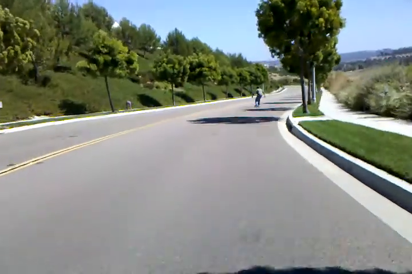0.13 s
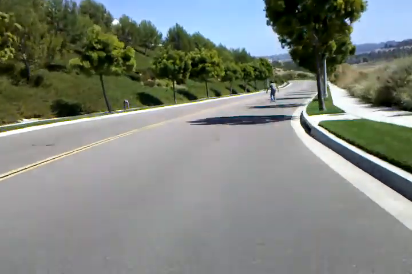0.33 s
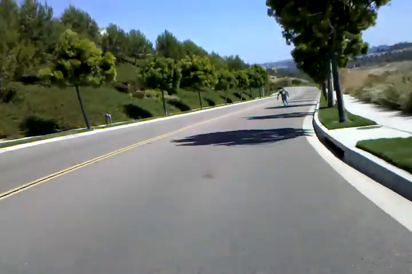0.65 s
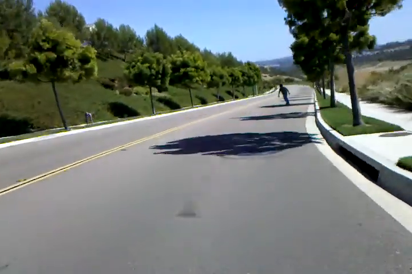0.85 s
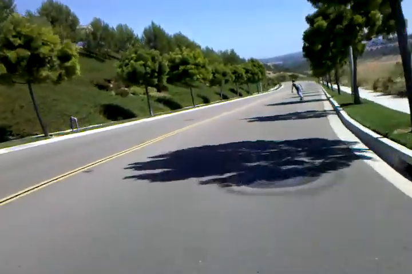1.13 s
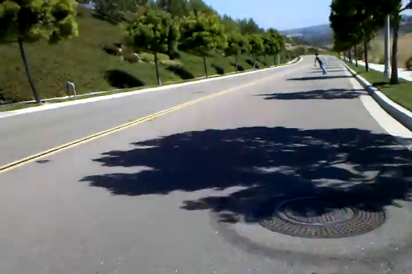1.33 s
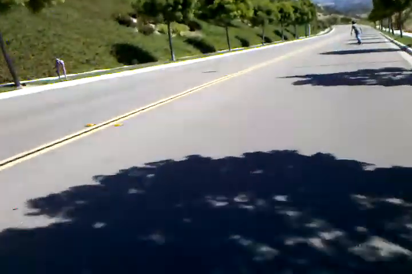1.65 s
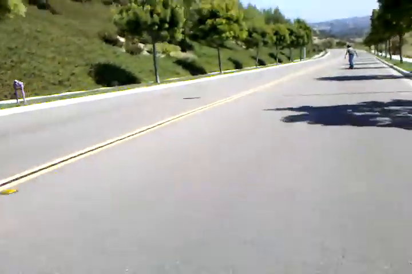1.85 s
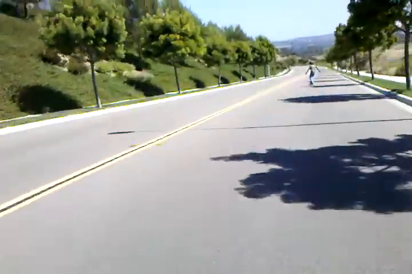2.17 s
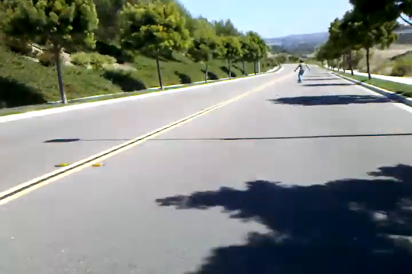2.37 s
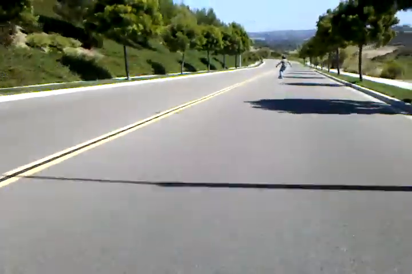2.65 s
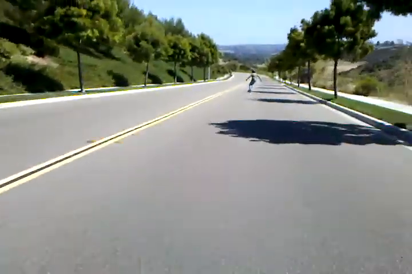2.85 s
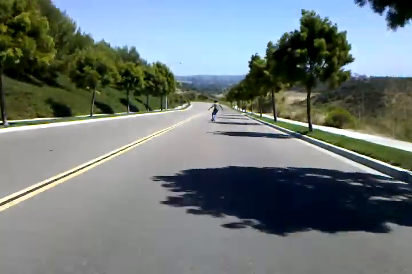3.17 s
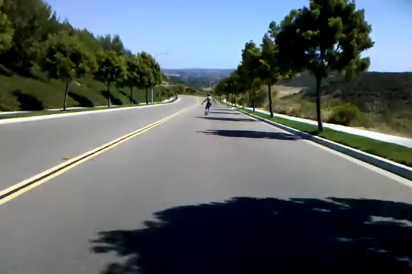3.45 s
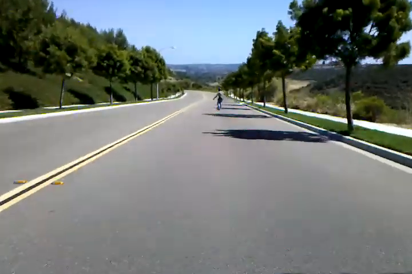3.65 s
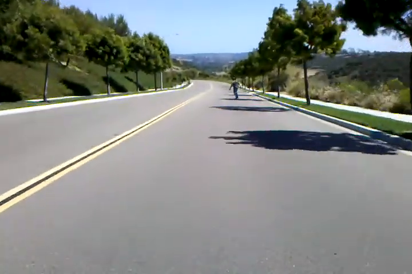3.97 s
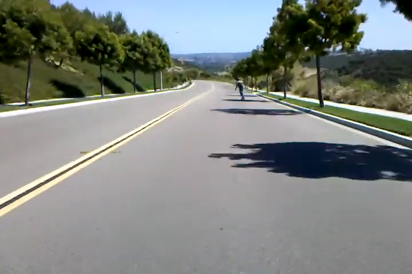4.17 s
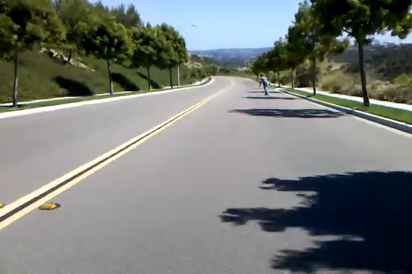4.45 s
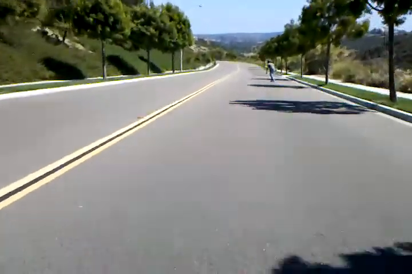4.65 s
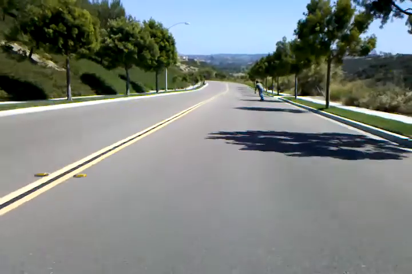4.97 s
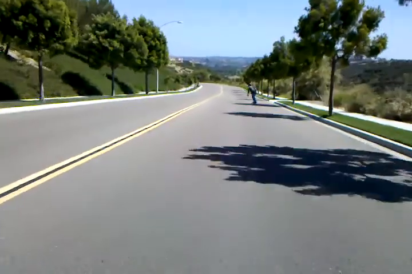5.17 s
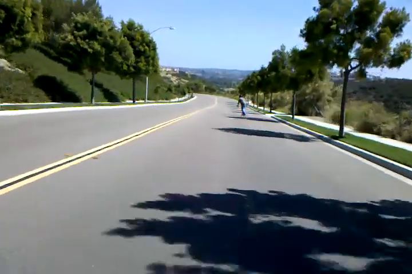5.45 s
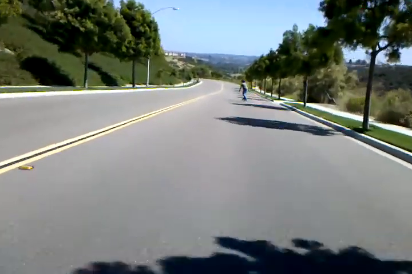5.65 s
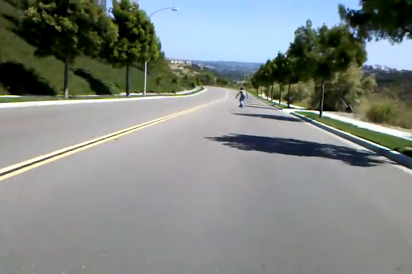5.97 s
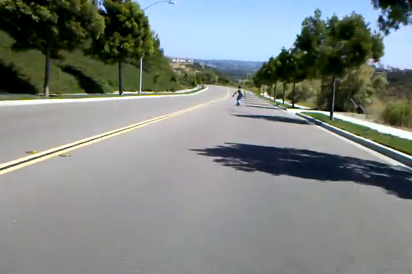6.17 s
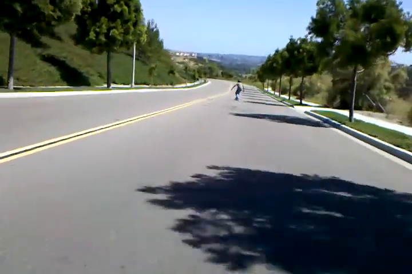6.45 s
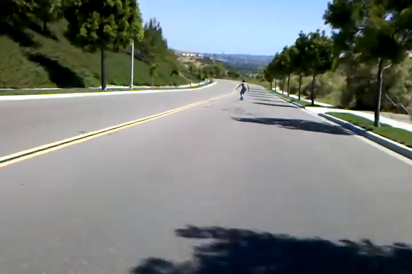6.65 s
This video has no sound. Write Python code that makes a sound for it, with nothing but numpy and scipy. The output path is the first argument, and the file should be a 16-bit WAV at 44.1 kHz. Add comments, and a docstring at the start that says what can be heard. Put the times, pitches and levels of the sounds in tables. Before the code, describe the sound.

A longboard rolls fast down an open asphalt road, heard from a small camera carried on the ride. From 0 seconds, wind buffets and rushes across the microphone, fluttering quickly, with a short opening swell and scattered soft thumps. Beneath it the wheels drum the road grain into the wooden deck, and the tread hisses thinly. From about 1.8 to 2.1 seconds the drumming surges as the board crosses an iron cover: a cluster of knocks with a brief ringing metal rattle. The ride then settles into rumble and wind, swelling around 2.8 and again near 4 seconds, with a sharp thump at 4.1. From 5 seconds gusts strengthen and thumps grow heavier, with a tiny tick near 5.2. The hardest blows, about 5.8 to 6.3, clip flat. Strong, brighter wind continues until the abrupt end near 6.8 seconds. The tone is close, rough and slightly muffled.

```python
"""Wind buffets and rushes over the microphone port of a small camera on a longboard, fast on an open asphalt road.
The wind is filtered noise that flutters, swells and dips; eddies and bumps are short pressure swings.
Below, the wheels drum the road grain into the deck (random taps that ring it) and the tread hisses (bright noise).
The board bumps over an iron cover that rattles (ringing noise bursts).
The recorder dulls the top, thins the deepest bass and clips the strongest swings flat."""
import sys
import numpy as np
from scipy import signal
from scipy.fft import rfft, irfft, next_fast_len
from scipy.io import wavfile
from scipy.ndimage import uniform_filter1d

SR = 44100
rng = np.random.default_rng(int(sys.argv[2]) if len(sys.argv) > 2 else 0)


def makeup_ratio(level_db):
    """Linear amplitude ratio for a level in decibels (20 dB per factor of ten)."""
    decades = np.asarray(level_db, float) / 20
    return 10 ** decades


def int16_out(signal):
    """Quantize to a 16-bit WAV file."""
    q = np.round(np.clip(np.atleast_2d(signal).T, -1, 1) * 32767)
    wavfile.write(sys.argv[1], SR, q.astype(np.int16))


N = 300762

# How the ride gathers speed and the wind swings: t/s, strength/dB over a reference level, extra treble/dB
WIND_STRENGTH = [(0, -2, -0.5), (.5, -.5, 3), (.73, -0.5, -2), (.8, 1, 0.5), (.92, 3.5, -2),
                 (1.2, -0.5, -0.5), (1.42, 0.5, -0.5), (1.75, -.5, 3), (2.15, 2, 0.5), (2.75, 4, 2),
                 (3.2, 2, 1), (3.75, 0.5, 0.5), (3.95, 4.5, 1), (4.25, 4.5, 1.5), (4.45, 3, 2),
                 (4.65, 3.5, 4), (4.85, 3, -0.5), (5.05, 5.5, -0.5), (5.25, 6, -1), (5.44, 5.5, 5.5),
                 (5.62, 4.5, 3.5), (6.05, 8, 2), (6.35, 5, 3), (6.55, 6.5, 1.5), (6.75, 7, 7),
                 (6.82, 8.5, 3)]
# Short swells and (minus) dips of the wind noise: t/s, length/s, change/dB, lean (about -1 dull to 1 bright)
SWELLS_AND_DIPS = [(0, 0.099, 7.5, -0.16), (0.09, 0.054, -0.5, -0.091), (.14, 0.035, -1.5, 0),
                   (0.228, .04, 2, -1.2), (0.292, .04, 4.5, -0.21), (.43, 0.055, 0.5, 1),
                   (0.62, 0.045, -3.5, -0.15), (0.678, 0.038, 3, -0.97), (.74, .04, -1.5, .2),
                   (.79, .04, 2, .5), (.88, .04, 2, 1), (.955, .04, 1, -.3), (1.0, .04, -2, 1),
                   (1.082, .05, 3.5, -0.17), (1.155, 0.066, -2, -0.11), (1.313, .04, -2, 0),
                   (1.228, 0.048, -0.5, -1.1), (1.366, .05, 3.5, 0.16), (1.49, 0.036, 1.5, -0.4),
                   (1.668, .06, -0.5, -0.17), (2.108, .06, -1, 0), (2.247, 0.058, 2, -.5),
                   (3.022, 0.039, 1, 0), (3.13, .08, -1.2, 0), (3.563, .1, 2, 0.52),
                   (3.66, 0.064, -1.5, .2), (3.783, 0.052, -1.5, 0.14), (3.9, .05, 1, 1),
                   (4.065, 0.035, -5, -0.19), (4.1, .04, 3.5, -0.28), (4.177, 0.064, 2, 0.9),
                   (4.344, .05, 1.5, -1), (4.385, .04, -1.5, 1), (4.856, 0.046, -1.5, 0),
                   (4.964, 0.08, 1.5, -0.3), (5.02, .02, 4, 0), (5.085, .04, -2, 0), (5.222, 0.035, 2, 0),
                   (5.39, .08, 1, 0.93), (5.466, 0.032, 2.5, -0.65), (5.556, 0.067, -1, -1),
                   (5.62, 0.048, -3, .3), (5.83, 0.051, 3, -0.4), (5.884, 0.035, -2, -.6),
                   (5.986, 0.09, 2.5, 0.42), (6.132, 0.07, 2, -0.54), (6.184, .04, -3.5, 0.6),
                   (6.244, .04, 3.5, -0.11), (6.678, 0.054, 1.5, -1)]
# Tone colours of the four noises, before each is set to its level: f/Hz, level/dB per Hz
BUFFET_COLOUR = [(15, -52.5), (25, -35), (43, -33), (88, -7), (125, -1.5), (180, -0.5), (300, -3.5),
                 (600, -10), (1200, -28), (3000, -51.5)]
RUSH_COLOUR = [(150, -26.5), (400, -0.5), (700, -0.5), (1000, -1.5), (1500, -5), (2050, -12.5),
               (3000, -29.5), (6000, -52)]
WHOOSH_COLOUR = [(700, -24), (1400, -2.5), (2000, -1), (2600, -4.5), (3400, -8.5), (4200, -16.5),
                 (6000, -30), (9000, -55)]
TREAD_HISS_COLOUR = [(2000, -26.5), (3500, -4), (4200, -4.5), (5150, -0.5), (5600, -3.5), (6200, -11.5),
                     (6900, -17), (9000, -17)]
# Thumps of eddies and road bumps: t/s, approximate peak level/dB, pitch f/Hz
EDDY_THUMPS = [(.2414, -12, 400), (.569, -10, 800), (.6637, -14, 348), (.6873, -10, 450), (.9599, -10, 400),
               (1.069, -13, 330), (1.46, -10.5, 700), (1.885, -8, 400), (1.9, -9, 400), (1.921, -9, 400),
               (1.9426, -5, 330), (1.9534, -7, 346), (1.9657, -5.5, 430), (1.9949, -5, 367),
               (2.024, -8, 420), (2.0381, -5.5, 600), (2.049, -7, 500), (2.063, -8, 400),
               (2.2391, -10, 380), (2.4851, -10, 420), (2.6731, -11, 420), (2.822, -9.5, 390),
               (2.999, -11, 600), (3.0208, -7, 1000), (3.0295, -9, 400), (3.11, -8, 450),
               (3.4492, -8.5, 750), (3.5821, -12, 300), (3.7182, -9.5, 800), (4.0156, -11, 400),
               (4.0888, -5, 596), (4.2114, -10.5, 450), (4.3351, -9, 374), (4.5759, -13, 400),
               (4.9535, -4.5, 294), (4.9906, -6, 330), (5.0271, -8, 600), (5.129, -9, 298),
               (5.2186, -7, 760), (5.455, -7, 270), (5.6756, -5, 650), (5.2331, -4.2, 300),
               (5.4752, -2.7, 350), (5.8263, -.9, 400), (5.8355, -2.2, 330), (6.0027, 0, 300),
               (6.0502, -2.3, 355), (6.1179, -2.6, 760), (6.1344, -2, 668), (6.075, -4, 344),
               (5.9587, -4.5, 493), (6.2252, -6.5, 297), (6.2497, -4, 227), (6.6479, -6, 407),
               (6.7772, -6, 500)]
# Resonances of the deck: f/Hz, width/Hz, relative level/dB
DECK_MODES = [(335, 120, -4.5), (436, 80, 1.5), (510, 80, -3), (916, 80, -11)]
# Roughness of the asphalt under the wheels: t/s, change on the deck/dB
ROAD_ROUGHNESS = [(0, 0), (.9, .5), (1.7, -.5), (2.3, 1), (3.3, 1.5), (3.7, 0), (4.5, 1.5), (5.5, 0),
                  (6.82, -.5)]
# Resonances of the iron cover: f/Hz, width/Hz, relative level/dB
COVER_MODES = [(1320, 70, 3), (1590, 150, 4.5), (1870, 200, 1.5), (2140, 90, -1), (2780, 350, -4),
               (3335, 150, -1), (4150, 400, -6.5), (4990, 250, -8), (5448, 55, 3), (5562, 50, 2.5),
               (6910, 200, -24)]
# Rattles of loose iron under the wheels: t/s, level before the band cut/dB, length/s, fade/s, top f/Hz
IRON_RATTLES = [(1.931, -17.5, .021, .011, 7500), (1.964, -25, .008, .014, 3000),
                (2.02, -24, .012, .01, 1600), (2.034, -21.5, .022, .009, 1700),
                (5.226, -22, .003, .0015, 5500)]


def turbulence(colour, shared_db, flicker_db, flicker_rate):
    """Coloured noise in overlapping octave bands, each flickering alone on top of a shared flutter."""
    size = next_fast_len(N)
    octave = np.log2(np.maximum(np.arange(size // 2 + 1) * SR / size, 1))
    hz, db = np.transpose(colour)
    spectrum = rfft(rng.standard_normal(size)) * makeup_ratio(np.interp(octave, np.log2(hz), db))
    out = 0
    for centre in np.arange(np.floor(np.log2(hz[0])), np.log2(hz[-1]) + 1):
        share = np.cos(np.pi / 2 * np.clip(octave - centre, -1, 1)) ** 2
        octave_band = irfft(spectrum * share, size)[:N]
        out = out + octave_band * makeup_ratio(flicker_db * walk(flicker_rate))
    return out * makeup_ratio(shared_db)


def buffet(flutter, db):
    """Low buffeting as the flow over the port breaks up and rejoins."""
    return in_band(turbulence(BUFFET_COLOUR, 1.1 * flutter, 1.1, 14), 70, 242, db)


def rush(flutter, db):
    """The middle of the wind noise, which flutters twice as deeply in dB as the buffeting."""
    return in_band(turbulence(RUSH_COLOUR, 2.2 * flutter, .9, 20), 645, 1600, db)


def whoosh(flutter, swing, db):
    """The brighter wind noise, which flutters and slowly wavers."""
    return in_band(turbulence(WHOOSH_COLOUR, 1.86 * flutter + swing, 1.0, 30), 1700, 3300, db)


def thumps():
    """Each is a push between two smaller pulls; also returns how far the port is blocked, from 0 to 1."""
    out, blocked, t = np.zeros(N), np.zeros(N), np.arange(N) / SR
    swell_cycles = .9  # sets how many cycles fit into a thump
    for s, db, hz in EDDY_THUMPS:
        near = np.abs(t - s) < .02
        turn = (t[near] - s) * hz
        swell = np.exp(-(turn / swell_cycles) ** 2 * 2.5)
        push = np.cos(2 * np.pi * turn) * swell
        balanced = push - swell * push.sum() / swell.sum()  # no lasting pressure is left
        out[near] += makeup_ratio(db) * balanced
        blocked[near] = np.maximum(blocked[near], swell)
    return out, blocked


def deck(db):
    """Road grain under the wheels: dense uneven taps that ring the wooden deck."""
    taps_per_s = 700
    strength_db = np.minimum(4.3 * rng.exponential(size=N), 9)
    taps = rng.standard_normal(N) * makeup_ratio(strength_db) * (rng.random(N) < taps_per_s / SR)
    soft = band(taps, 55, 1500)  # the urethane wheels round every tap
    drumming = ring(soft * makeup_ratio(0.36 * walk(35)), DECK_MODES)
    return in_band(drumming, 210, 650, db)


def cover():
    """The loose lid chatters in its frame under the wheels: uneven noise that rings, plus a broad scrape."""
    out, t = 0, np.arange(N) / SR
    chatter = rng.standard_normal(N) * makeup_ratio(0.75 * walk(300))
    ringing = level(ring(chatter, COVER_MODES), 0)
    low_pass = signal.butter(1, 2500, fs=SR, output="sos")
    scrape = signal.sosfilt(low_pass, rng.standard_normal(N) * makeup_ratio(4.5 * walk(400)))
    iron = ringing + level(scrape, -5)  # wheel on iron, 5 dB under the ringing
    for s, db, length, fade, top_hz in IRON_RATTLES:
        rise = np.clip((t - s) / 0.004, 0, 1)
        fall = np.exp(-np.clip(t - s - length, 0, None) / fade)
        out = out + makeup_ratio(db) * rise * fall * band(iron, 880, top_hz)
    return out


def tread_hiss(flutter, swing, db):
    """Hiss of the tread: bright noise that flutters and wavers along with the wind."""
    return in_band(turbulence(TREAD_HISS_COLOUR, 1.8 * flutter + swing, 0.99, 30), 4000, 6500, db)


def swell_levels(t):
    """Adds up the short swells and dips as smooth bumps in dB, for the dull, middle and bright sounds."""
    dull, middle, bright = 0, 0, 0
    for at, length, db, lean in SWELLS_AND_DIPS:
        bump = db * np.exp(-((t - at) / length * 2) ** 2)
        dull = dull + (1 - lean) * bump
        middle = middle + bump
        bright = bright + (1 + lean) * bump
    return dull, middle, bright


def crossing(t):
    """How far the wheels are on the ribbed cover, 0 to 1: a straight rise, a hold and a straight fall."""
    start_s, rise_s, hold_s, fall_s = 1.795, .13, 0.087, 0.1
    end_s = start_s + rise_s + hold_s
    return np.clip(np.minimum((t - start_s) / rise_s, 1 - (t - end_s) / fall_s), 0, 1)


def levels():
    """Levels in dB of buffeting, deck, rush, whoosh and hiss from the wind, swells, road and crossing."""
    t = np.arange(N) / SR
    s, strength_db, treble_db = np.transpose(WIND_STRENGTH)
    strength, treble = np.interp(t, s, strength_db), np.interp(t, s, treble_db)
    dull, middle, bright = swell_levels(t)
    cross = crossing(t)
    air_db = 6.5 * cross  # the low and middle wind noise also rises at the cover
    road_db = np.interp(t, *np.transpose(ROAD_ROUGHNESS))
    # each has a level at strength 0 and changes by so many dB per dB of strength
    buffet_db = -31 + 1.12 * strength + dull + air_db
    deck_db = -29.5 + 0.64 * strength + road_db + .7 * dull + 8.5 * cross  # drums harder on the cover
    rush_db = -33 + strength + middle + air_db
    whoosh_db = -42 + 1.064 * strength + treble + bright
    hiss_db = -50 + 0.79 * strength + .8 * treble + .5 * bright
    return buffet_db, deck_db, rush_db, whoosh_db, hiss_db


def level(x, db):
    """Scale to an rms level."""
    return x * makeup_ratio(db) / np.sqrt(np.mean(x ** 2))


def in_band(x, lo_hz, hi_hz, db):
    """Set a layer so that its main band follows the level curve."""
    return x * makeup_ratio(db) / np.sqrt(np.mean(band(x, lo_hz, hi_hz) ** 2))


def band(x, lo_hz, hi_hz):
    """The part of a sound between two frequencies."""
    return signal.sosfilt(signal.butter(3, [lo_hz, hi_hz], "band", fs=SR, output="sos"), x)


def ring(x, modes):
    """Sum of two-pole resonances with alternating sign."""
    out = 0
    for k, (hz, width, db) in enumerate(modes):
        resonance = signal.iirpeak(hz, hz / width, fs=SR)
        out = out + (-1) ** k * makeup_ratio(db) * signal.lfilter(*resonance, x)
    return out


def walk(rate):
    """Random levels held 1 / rate s and smoothed twice; spread near 1."""
    k = int(SR / rate)
    steps = np.repeat(rng.standard_normal(N // k + 1), k)
    return 1.06 * uniform_filter1d(uniform_filter1d(steps, k), k)[:N]


def scene():
    """Wind at the port, wheels below."""
    buffet_db, deck_db, rush_db, whoosh_db, hiss_db = levels()
    flutter = 0.42 * walk(35) + 0.64 * walk(90)  # the flow over the port breaks up and rejoins
    swing = .7 * walk(12)  # the treble wavers
    wind = buffet(flutter, buffet_db) + rush(flutter, rush_db) + whoosh(flutter, swing, whoosh_db)
    eddies, blocked = thumps()
    # an eddy on the port masks the wind and the deck for a moment
    around = (wind + deck(deck_db)) * (1 - .85 * blocked)
    return (around + eddies + cover() + tread_hiss(flutter, swing, hiss_db))[None]


def top_cut(x):
    """Nothing passes above the cut-off."""
    return signal.sosfilt(signal.butter(12, 16000, fs=SR, output="sos"), x)


def record(dry):
    """The recorder cuts the top steeply and the deepest bass, adds a faint hiss and clips flat."""
    top_hz, bass_hz, full_scale = 7015, 30, .707
    narrow = signal.sosfilt(signal.cheby1(10, .5, top_hz, fs=SR, output="sos"), dry)
    narrow = signal.sosfiltfilt(signal.butter(2, bass_hz, "high", fs=SR, output="sos"), narrow)
    own_hiss = level(band(rng.standard_normal(N), 7600, 8700), -92)
    clipped = np.clip(narrow + own_hiss, -full_scale, full_scale)
    return top_cut(clipped)


dry = scene()
out = record(dry)
int16_out(out)
```